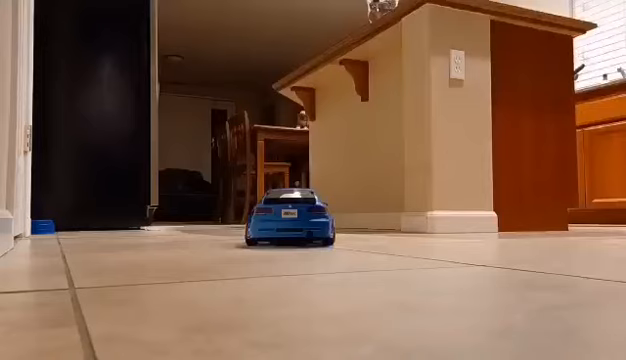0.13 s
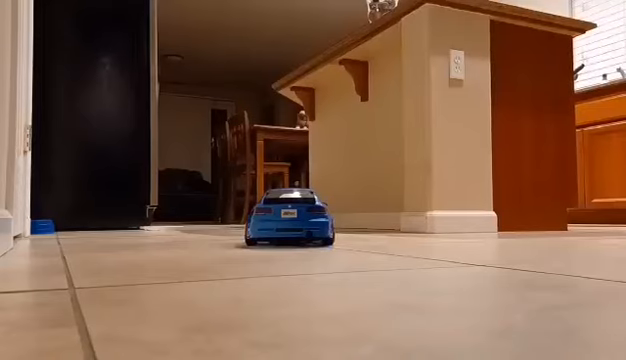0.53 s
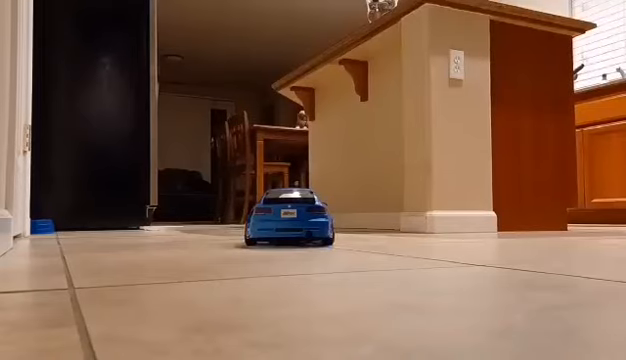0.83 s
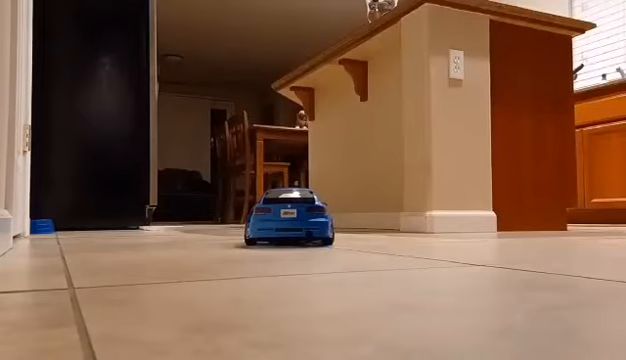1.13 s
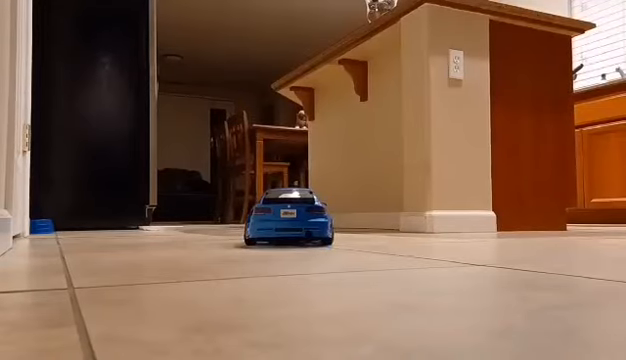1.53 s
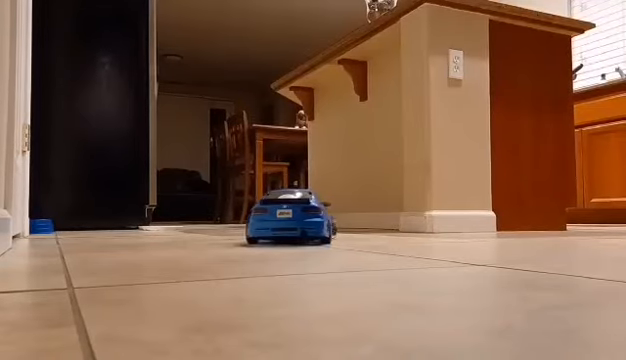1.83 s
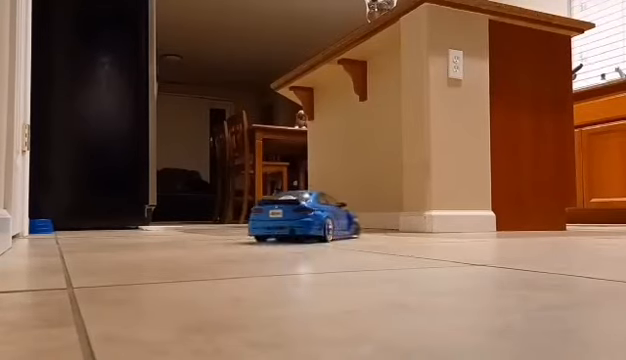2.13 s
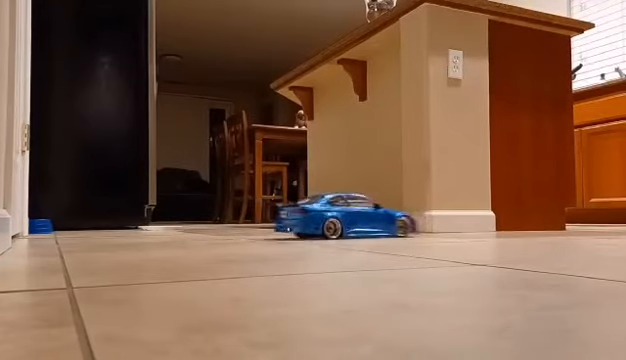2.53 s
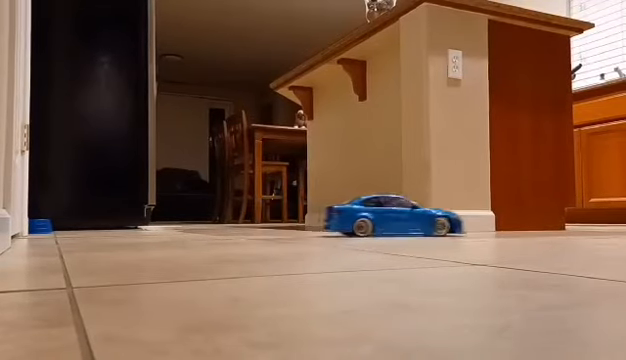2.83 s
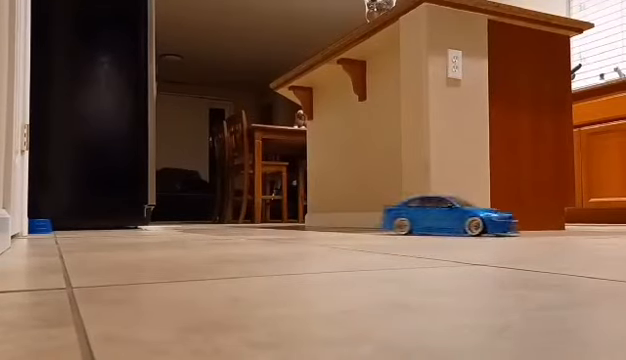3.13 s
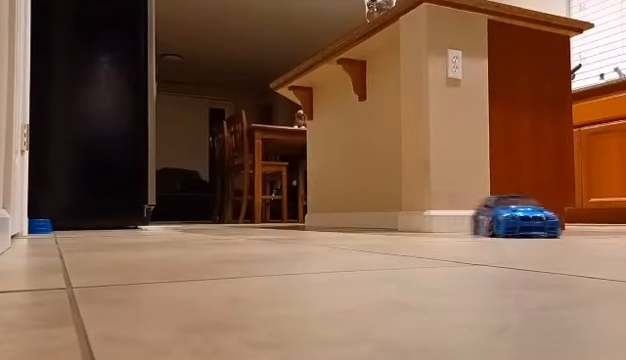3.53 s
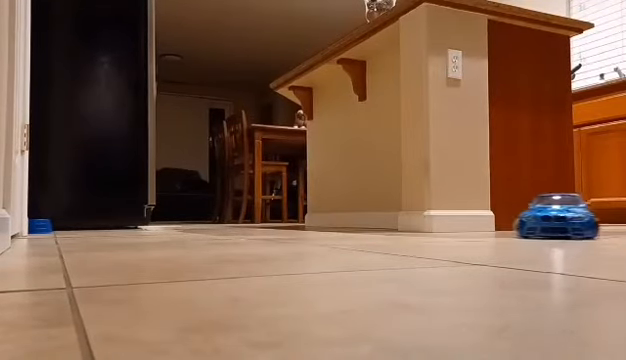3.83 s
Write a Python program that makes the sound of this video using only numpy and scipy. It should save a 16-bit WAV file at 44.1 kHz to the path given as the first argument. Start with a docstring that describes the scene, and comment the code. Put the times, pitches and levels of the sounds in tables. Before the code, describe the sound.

A small electric toy car idles with a faint whine, then spins its wheels and slides over a tiled kitchen floor in bursts. Gears whir and tyres hiss, with three exhaust pops and scattered spark snaps, moving from left to centre.

```python
"""A toy drift car on a tiled kitchen floor, heard on a pair of microphones with walls close by.
It waits on the left, electronics whining faintly, then spins its wheels and slides towards the
middle in bursts of throttle. Gears whine and rattle, the plastic shell drones and hard tyres hiss
on the tiles. An igniter in its exhaust snaps now and then; three times the gas catches with a pop."""
import sys
import numpy as np
from scipy import signal
from scipy.fft import rfft, irfft
from scipy.io import wavfile
from scipy.ndimage import uniform_filter1d

SR = 44100
rng = np.random.default_rng(int(sys.argv[2]) if len(sys.argv) > 2 else 0)


def transcribe(signal):
    """Save signal, clipped to [-1, 1], as a 16-bit WAV file at the path in sys.argv[1]."""
    frames = np.atleast_2d(signal).T
    limited = np.clip(frames, -1, 1)
    pcm = np.round(limited * 32767).astype(np.int16)
    wavfile.write(sys.argv[1], SR, pcm)


N = 176400
T = np.arange(N) / SR
START_S, GRIP_S, GRIP_TAKES_S = 1.510, 2.542, 0.25
FULL_MESH_HZ = 4450

# faders of the car's layers (t/s, shell drone/dB, chassis rattle/dB, gears/dB, tyre hiss/dB)
LEVELS = [(1.46, -67, -58, -56, -70), (1.5, -73, -43.5, -52, -44), (1.54, -44, -35, -33.5, -36.5),
          (1.595, -34.5, -27.5, -25.5, -25.5), (1.65, -30.5, -27.5, -26.5, -28),
          (1.7, -30, -26.5, -28, -25.5), (1.86, -27.5, -30, -30, -22.5), (1.97, -31, -31.5, -33.5, -25),
          (2.22, -31, -32, -31.5, -25.5), (2.42, -31.5, -39.5, -37, -29.5),
          (2.57, -35.5, -36, -34.5, -34.5), (2.67, -36.5, -35.5, -40, -31), (2.82, -35, -36, -40, -36.5),
          (3.0, -33.5, -36.5, -38.5, -35), (3.13, -34.5, -36.5, -38.5, -36.5),
          (3.22, -35.5, -47, -43.5, -62), (3.29, -38.5, -45.5, -51.5, -60),
          (3.36, -36.5, -34.5, -37.5, -32.5), (3.58, -34, -37.5, -36, -35), (3.75, -33.5, -35, -32, -34),
          (3.83, -43, -37, -39, -52), (3.9, -37.5, -45, -43, -73), (3.97, -43.5, -30, -31, -26.5),
          (4.0, -33, -40, -38, -39)]
# spectrum of knocking gear teeth (f/Hz, level/dB)
TEETH_SPECTRUM = [(30, -38), (150, -4), (1200, -13.5), (2150, -1), (2400, -0.5), (2550, 3), (2800, 6),
                  (3000, 5), (3350, 1.5), (3800, 1.5), (4250, 1), (4600, -2.5), (5700, -4.5), (6800, -3.5),
                  (8000, -1), (9000, -9), (13000, -9)]


def amp(db):
    """Decibels to gain."""
    return 10 ** (np.asarray(db) / 20)


def unit(x):
    """Scales to rms 1."""
    return x / np.sqrt(np.mean(x ** 2) + 1e-20)


def curve(table, axis=1):
    """One column of a time table, at every sample."""
    rows = np.array(table)
    return np.interp(T, rows[:, 0], rows[:, axis])


def read(points, hz):
    """Reads a table on a log-frequency axis."""
    f, value = np.transpose(points)
    return np.interp(np.log(hz + 1), np.log(f + 1), value)


def add(mix, s, sound):
    """Mixes a sound in at a time."""
    part = mix[..., round(s * SR):][..., :sound.shape[-1]]
    part += sound[..., :part.shape[-1]]


def wander(hz):
    """Random drift up to a rate, rms 1."""
    f = np.fft.rfftfreq(N, 1 / SR)
    return unit(irfft(rfft(rng.standard_normal(N)) / (1 + (f / hz) ** 4), N))


def tone(hz):
    """A sine of rms 1 that follows a pitch curve."""
    return np.sqrt(2) * np.sin(2 * np.pi * (np.cumsum(hz) / SR + rng.random()))


def wavering(hz, waver, waver_hz, flutter, flutter_hz):
    """A tone whose pitch wavers and whose level flutters."""
    return tone(hz * (1 + waver * wander(waver_hz))) * (1 + flutter * wander(flutter_hz))


def sides(db):
    """Microphone gains for a left-minus-right level."""
    return amp(np.array([[.5], [-.5]]) * db)


def coloured(pair, spectrum):
    """Gives two independent noises a spectrum and the likeness of the two microphones."""
    # likeness of left and right (f/Hz, correlation)
    likeness = [(60, 1), (150, 0.77), (280, 1), (600, 0.25), (1300, 0), (2900, 0.22), (6000, 0)]
    f = np.fft.rfftfreq(N, 1 / SR)
    left, other = rfft(pair)
    same = np.clip(read(likeness, f), -1, 1)
    right = same * left + np.sqrt(1 - same ** 2) * other
    return unit(irfft(np.array([left, right]) * amp(read(spectrum, f)), N))


def grit(per_s, spread_db, share):
    """Tiny knocks of uneven size in a wash of noise, for two microphones."""
    knocks = (rng.random(N) < per_s / SR) * amp(spread_db * np.minimum(rng.exponential(1, N), 2))
    return share * unit(knocks * rng.choice([-1, 1], (2, N))) + rng.standard_normal((2, N))


def patchy(x, patch_hz=260, patch_s=.045, patch_db=3.4, ripple_db=2.6):
    """Many small resonances ripple the spectrum, and their strength shifts as the car moves."""
    hz, t, z = signal.stft(x, SR, nperseg=1024, noverlap=768)
    bins, frames = round(patch_hz / hz[1]), round(patch_s / t[1])
    patches = uniform_filter1d(rng.standard_normal(z.shape[1:]), bins, 0)
    patches = unit(uniform_filter1d(patches, frames, 1))
    ripple = unit(uniform_filter1d(rng.standard_normal(len(hz)), size=3))[:, None]
    depth = np.clip(hz / 2000, .3, 1)[:, None]
    z *= amp(depth * (patch_db * patches + ripple_db * ripple))
    return unit(signal.istft(z, SR, nperseg=1024, noverlap=768)[1][:, :N])


def room(x, length=26000):
    """The kitchen's tail: sparse reflections, each band dying at its own speed."""
    # reverberation time (f/Hz, t60/s)
    decay = [(200, 0.11), (2000, 0.11), (8000, 0.2), (13000, 0.024)]
    taps = rng.standard_normal((2, length)) * (rng.random((2, length)) < .08) * (np.arange(length) > 120)
    hz, t, z = signal.stft(taps, SR, nperseg=256)
    tail = signal.istft(z * amp(-60 * t / read(decay, hz)[:, None]), SR, nperseg=256)[1]
    return signal.fftconvolve(np.atleast_2d(x), tail / np.linalg.norm(tail[0]), axes=1)[:, :N]


def grip():
    """0 while the wheels spin on the spot, 1 once the car is under way."""
    return np.clip((T - GRIP_S) / GRIP_TAKES_S + .5, 0, 1)


def by_grip(spinning, rolling):
    """Equal-power crossfade as the tyres grip."""
    return np.sqrt(1 - grip()) * spinning + np.sqrt(grip()) * rolling


def air_and_electronics(air_db=-54.5, pan_db=5, from_s=0.0615):
    """Room air throughout, and the electronics' thin whine until the car starts; both to the left."""
    # whine of the waiting electronics (f/Hz, level/dB)
    idle_tones = [(1116, -63.5), (3348, -71.5)]
    # room tone (f/Hz, level/dB)
    air_spectrum = [(25, -42), (45, -14), (62, -0.5), (90, -5), (160, -7), (230, -1.5), (330, -8),
                    (600, -8.5), (1150, -11), (1600, -14.5), (2200, -19), (2700, -14), (3300, -11),
                    (4200, -18.5), (5000, -14.5), (6200, -24.5), (8000, -23.5), (9700, -31), (12000, -20.5),
                    (13000, -36)]
    whine = sum(amp(db) * tone(hz * (1 + 0.0024 * wander(10.5))) for hz, db in idle_tones)
    air = coloured(rng.standard_normal((2, N)), air_spectrum) * amp(air_db + .5 * wander(26))
    fade_in = np.clip((T - from_s) / 0.014, 0, 1)
    return (air + whine * (T < START_S)) * sides(pan_db) * fade_in


def ticks(decay_s=0.00043, room_db=-10):
    """Faint ticks while the car waits, each a tiny burst of noise."""
    # ticks (t/s, level/dB)
    events = [(.263, -42), (.3054, -38), (.4331, -38), (.5668, -38)]
    out, t = np.zeros((2, N)), np.arange(100) / SR
    for s, db in events:
        add(out, s, amp(db) * rng.standard_normal((2, len(t))) * np.exp(-t / decay_s))
    return out + amp(room_db) * room(out)


def start_knock(db=-32.5, decay_s=0.0065):
    """The gears take up their slack as the motor starts."""
    age = np.maximum(T - START_S, 0)
    return amp(db) * coloured(rng.standard_normal((2, N)), TEETH_SPECTRUM) * np.exp(-age / decay_s)


def gearbox(x, launch_db=2):
    """The gearbox rings in its narrow modes, harder under the load of the launch."""
    # gearbox modes (f/Hz, width/Hz, gain/dB)
    modes = [(2373, 65, 4), (2773, 70, -1), (3177, 53, 0.5), (3396, 29, 2.5), (3740, 35, -3),
             (4670, 20, 3.5), (4990, 49.6, -25)]
    ring = sum(amp(db) * signal.lfilter(*signal.iirpeak(hz, hz / width, fs=SR), x)
               for hz, width, db in modes)
    return ring * amp(launch_db * (1 - grip()))


def gears(mesh, jitter=0.01385, whine_grip_db=-12, beat_ratio=0.0097):
    """Meshing teeth whine at full speed and rasp, lighting up each gearbox mode as they sweep past."""
    # partials of the whine (multiple of the mesh rate, relative level/dB)
    partials = [(.4, -8), (1, -11.5), (1.998, -14)]
    level = amp(curve(LEVELS, axis=3))
    shaky = mesh * (1 + jitter * wander(86))
    whine = sum(amp(db + 2.1 * wander(17)) * tone(k * shaky) for k, db in partials)
    whine *= level * amp(whine_grip_db * grip()) * np.minimum(mesh / FULL_MESH_HZ, 1) ** 3
    # a band of noise round the mesh rate, twice as wide once rolling
    rasp = np.array([tone(mesh) * by_grip(wander(260), wander(520)) for _ in range(2)])
    rasp *= amp(3 * wander(20.8))
    rattle = patchy(coloured(grit(per_s=900, spread_db=2.5, share=.9), TEETH_SPECTRUM))
    whirr = amp(-9) * rasp + amp(-1) * rattle + gearbox(rasp + amp(-5) * rattle)
    beat = 1 + 0.115 * tone(mesh * beat_ratio)
    return 0.88 * whine + 0.45 * room(whine) + level * whirr * beat


def shell(drive_hz, mesh, hum_from_hz=3440, note_db=-6.5):
    """The plastic body drones; the drive train hums in it at full spin, and it sings once rolling."""
    # drive train hum (multiple of drive_hz, relative level/dB)
    hum_tones = [(0.0644, -10), (0.0766, -13.5), (.0884, -2.5), (0.104, -26)]
    # resonances of the shell (f/Hz, level/dB)
    spectrum = [(40, -47), (120, -15), (230, -8.5), (300, -6), (355, 5.5), (395, -1.5), (435, 3),
                (480, -3.5), (520, 7), (600, -15), (900, -31), (2000, -58)]
    # its main resonance shifts as the car rolls and steers (t/s, f/Hz)
    rolling_note = [(2.55, 412), (2.8, 425), (2.9, 450), (3.07, 424.6), (3.23, 455), (3.42, 446),
                    (3.72, 420), (4.0, 440)]
    full_spin = np.clip((mesh - hum_from_hz) / (FULL_MESH_HZ - hum_from_hz), 0, 1) * (grip() < 1)
    hum = sum(amp(db) * wavering(k * drive_hz, 0.0099, 28, 0.32, 12) for k, db in hum_tones)
    drone = coloured(grit(per_s=160, spread_db=-5.5, share=0.2), spectrum) * amp(-3 - 3 * full_spin)
    note = amp(note_db) * wavering(curve(rolling_note), 0.0099, 29.6, 0.74, 25)
    return (drone + grip() * note + full_spin * hum) * amp(curve(LEVELS))


def chassis(drive_hz, trim_db=-4):
    """The chassis rattles, and the drive train growls in it while the wheels spin."""
    # drive train growl (multiple of drive_hz, level/dB re the rattle)
    growl_tones = [(.1535, -10.5), (.192, -6), (.2125, -11)]
    # colour of the rattle (f/Hz, level/dB)
    spectrum = [(300, -35.5), (600, 5), (750, 2), (950, 4.5), (1250, 1.5), (1650, 2.5), (1950, -2),
                (2300, -3.5), (4000, -21)]
    growl = sum(amp(db) * wavering(k * drive_hz, 0.0118, 42, 0.26, 28) for k, db in growl_tones)
    rattle = patchy(coloured(grit(per_s=330, spread_db=2.0, share=0.85), spectrum))
    return (rattle + (1 - grip()) * growl) * amp(trim_db + curve(LEVELS, axis=2))


def tyres(trim_db=1.5, flutter_db=2.5):
    """Hard tyres scrape the tiles with a hiss that changes colour once they grip."""
    # hiss of spinning tyres (f/Hz, level/dB)
    spin_spectrum = [(30, -20), (150, -5), (2500, -6.5), (4300, -20), (4900, -2.5), (5500, 0.5),
                     (6000, -17), (6800, -1.5), (8800, -8), (9700, 4), (10400, 2.5), (11000, 3), (13000, 2)]
    # hiss of rolling tyres (f/Hz, level/dB)
    roll_spectrum = [(30, -28), (150, -4), (2500, -8), (4500, 10), (5800, 3), (7000, 11.5), (8100, 4),
                     (9000, 12), (10200, 6.5), (11800, 12.5), (13000, 12.5)]
    spinning = patchy(coloured(grit(per_s=1200, spread_db=-1, share=0.49), spin_spectrum))
    rolling = patchy(coloured(grit(per_s=520, spread_db=-5.5, share=0.48), roll_spectrum)) * amp(0.5)
    return by_grip(spinning, rolling) * amp(trim_db + curve(LEVELS, axis=4) + flutter_db * wander(21))


def thump(age, hz, end_share=.45, fall_periods=.8, decay_periods=2.4):
    """A low thump after the pop that falls in pitch as it dies away."""
    periods = age * hz
    turns = end_share * periods + (1 - end_share) * fall_periods * (1 - np.exp(-periods / fall_periods))
    envelope = (1 - np.exp(-age / 0.00057)) * np.exp(-(periods / decay_periods) ** 2)
    return -np.cos(2 * np.pi * turns - .7) * envelope


def gas_pops(pops, push_s=.0006, boom_hz=236, boom_s=0.024, room_db=-17):
    """Gas catches: a push of air, a short low ringing boom, a thump that differs at each microphone."""
    out, t = np.zeros((2, N)), np.arange(4000) / SR
    push = np.sin(np.pi * np.minimum(t / push_s, 1))
    recoil = .3 * np.sin(np.pi * np.clip((t / push_s - 1) / 2, 0, 1))
    boom = amp(-22) * np.sin(2 * np.pi * boom_hz * t) * np.exp(-t / boom_s)
    after = np.maximum(t - push_s, 0)
    for s, push_db, pan_db, left_db, left_hz, right_db, right_hz in pops:
        thumps = np.array([amp(left_db) * thump(after, left_hz), amp(right_db) * thump(after, right_hz)])
        add(out, s, amp(push_db) * sides(pan_db) * (push - recoil + boom) + thumps)
    out = signal.lfilter(*signal.butter(2, 40, 'high', fs=SR), out)
    return out + amp(room_db) * room(out)


def spark(hz, crack_db, decay_s=.0005, jolt_hz=2600):
    """A spark: a first jolt of air, a bright crack and a ring of a few cycles."""
    t = np.arange(400) / SR
    noise = rng.standard_normal((2, len(t)))
    crack = signal.lfilter(*signal.butter(3, 6000, 'high', fs=SR), noise) + .45 * noise
    ring = np.sin(2 * np.pi * hz * rng.uniform(0.963, 1.03) * t + rng.uniform(0, 2 * np.pi, (2, 1)))
    envelope = (1 - np.exp(-t / 0.0004)) * np.exp(-t / decay_s)
    jolt = .6 * np.exp(-t / .00016) * np.sin(2 * np.pi * jolt_hz * t)
    return (ring + amp(crack_db) * crack) * envelope / envelope.max() + jolt


def igniter(snaps, room_db=-10):
    """Sparks snap in the exhaust and come back off the near walls."""
    # wall reflections (delay/s, level/dB)
    echoes = [(.0028, -16), (.0058, -10), (.0102, -11), (.0135, -13), (.0225, -15)]
    # the echoes grow as the car nears the counter (t/s, gain/dB)
    echo_gain = [(3.05, 0), (3.3, 3.5)]
    out = np.zeros((2, N))
    for s, db, hz, crack_db in snaps:
        add(out, s, spark(hz, crack_db) * amp(db))
        near_db = np.interp(s, *np.transpose(echo_gain))
        for delay, echo_db in echoes:
            arrival = s + delay * rng.uniform(0.98, 1.0)
            add(out, arrival, spark(hz, crack_db) * amp(db + echo_db + near_db))
    return out + amp(room_db) * room(out)


def dips(events, depth_db, lead_s=0.0069, length_s=0.046):
    """A gain that dips briefly around each event."""
    ages = [T - s + lead_s for s, *_ in events]
    shapes = [np.clip(age / 0.0023, 0, 1) * np.exp(-(age / length_s) ** 2) for age in ages]
    return amp(-depth_db * np.max(shapes, 0))


def scene(left_lag_s=.0001):
    """The car, its exhaust and the kitchen; the left microphone hears the car a little later."""
    # motor speed as the gears' mesh rate (t/s, f/Hz)
    speed = [(1.49, 509), (1.55, 2020), (1.595, 3202), (1.65, 3500), (1.69, 4079), (1.78, 4630),
             (1.87, 4848), (2.0, 4910), (2.45, 4913), (2.5, 3400), (2.56, 2598), (2.62, 3354), (2.69, 4570),
             (2.78, 3360), (2.84, 2488), (2.92, 2783), (3.01, 3800), (3.09, 2870), (3.14, 2252),
             (3.29, 600), (3.35, 2345), (3.43, 3523), (3.52, 2835), (3.6, 3210), (3.66, 4450), (3.72, 3210),
             (3.76, 2480), (3.82, 2085), (3.91, 703), (3.94, 2535), (4.0, 3520)]
    # the car moves from the left towards the middle (t/s, left minus right/dB)
    path = [(1.5, 5.5), (2.1, 3.5), (2.6, 0.5), (4, 1)]
    # gas pops (t/s, push/dB, its pan/dB, left thump level/dB, f/Hz, right thump level/dB, f/Hz)
    pops = [(1.8840, -9.5, 2, -18.5, 294, -14.5, 166), (2.1319, -19, 18.5, -15.5, 160, -27, 300),
            (2.283, -22.5, 11, -23.5, 169, -23, 263)]
    # igniter snaps, the row at 3.4513 s being a strong wall echo of the snap just before it (t/s, level/dB,
    # ring f/Hz, crack/dB re the ring)
    snaps = [(1.8900, -16, 8150, -14), (2.1384, -21, 8100, -10), (2.2844, -16, 8100, -9),
             (2.29, -21, 8000, -3), (2.4763, -12.5, 9000, -4), (2.6228, -17.5, 8060, -6),
             (2.7403, -11.5, 7850, -3), (2.9391, -13.5, 8120, 0), (3.0530, -16, 7980, -1),
             (3.3254, -17.5, 8430, -5), (3.4455, -15, 8270, 0), (3.4513, -15.5, 8300, -8),
             (3.6928, -11, 8000, -2), (3.7027, -17, 8250, -6), (3.9262, -13.5, 8340, -6)]
    mesh, pan = curve(speed), curve(path)
    drive_hz = mesh.max() * (mesh / mesh.max()) ** .45  # hum and growl sag less than the mesh rate
    body = gears(mesh) + shell(drive_hz, mesh) + chassis(drive_hz) + start_knock()
    car = body * sides(pan) + tyres() * sides(0.25 * pan)
    car *= np.minimum(dips(pops, depth_db=10.5), dips(snaps, depth_db=4))
    left, right = car * np.clip((T - START_S) / 0.003, 0, 1)
    left = np.pad(left, (round(left_lag_s * SR), 0))[:N]
    return np.array([left, right]) + igniter(snaps) + ticks() + gas_pops(pops) + air_and_electronics()


def record(dry, edge_hz=13120):
    """The recorder's band limit: a steep low-pass on both microphones."""
    lowpass = signal.firwin(801, edge_hz, window=("kaiser", 8), fs=SR)
    return signal.oaconvolve(dry, lowpass[None], "same")


dry = scene()
out = record(dry)
transcribe(out)
```